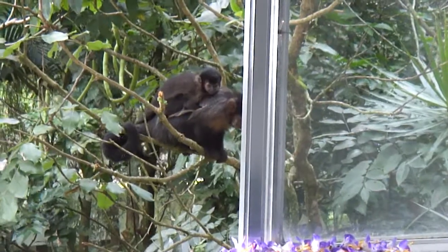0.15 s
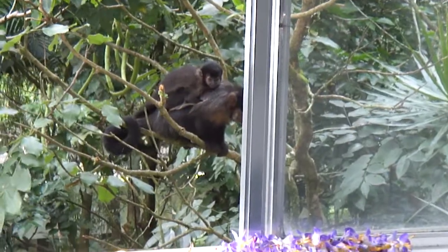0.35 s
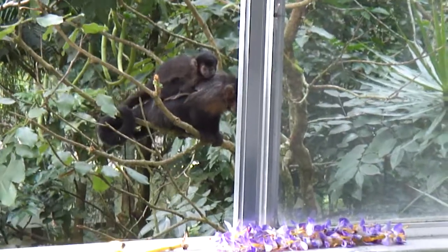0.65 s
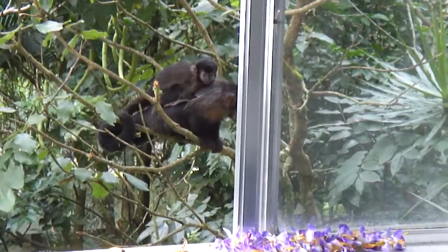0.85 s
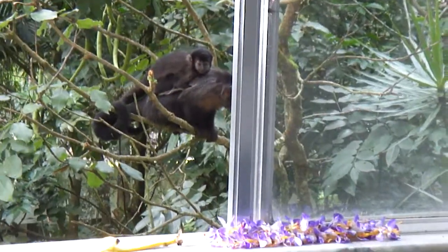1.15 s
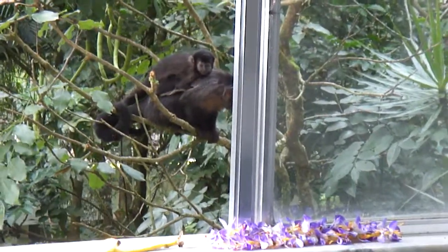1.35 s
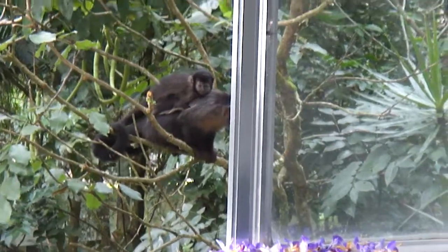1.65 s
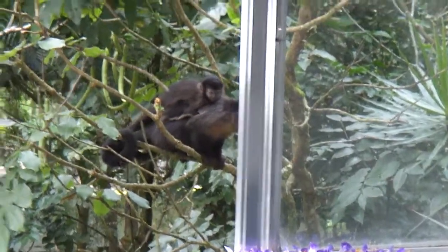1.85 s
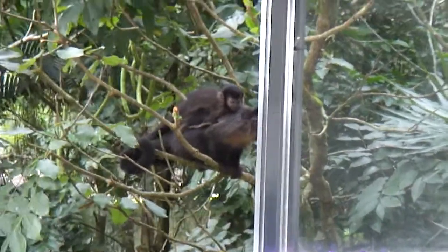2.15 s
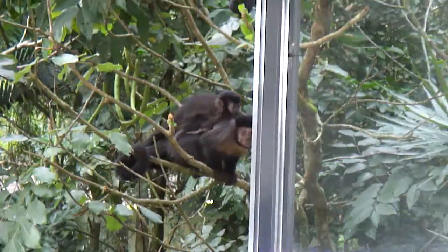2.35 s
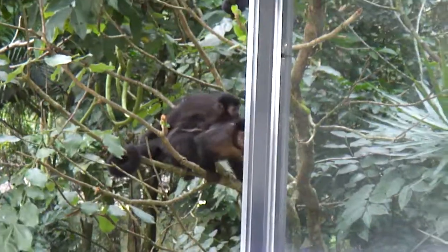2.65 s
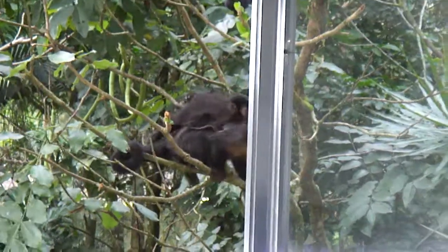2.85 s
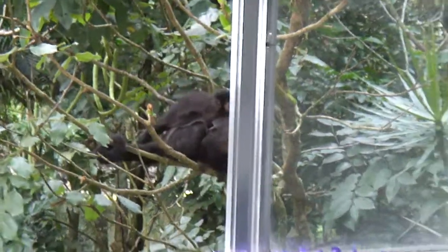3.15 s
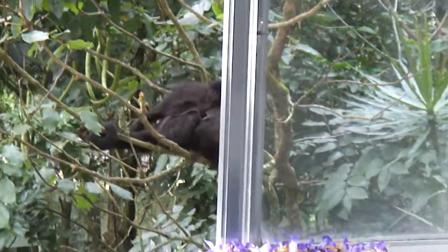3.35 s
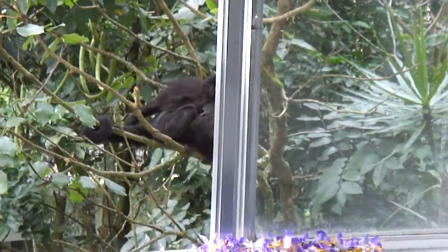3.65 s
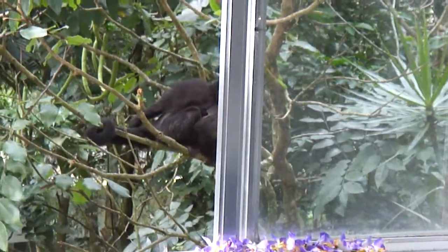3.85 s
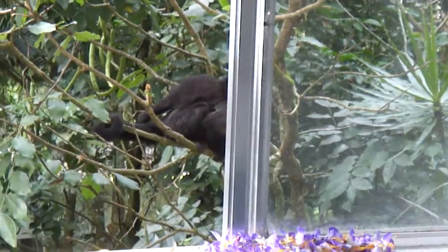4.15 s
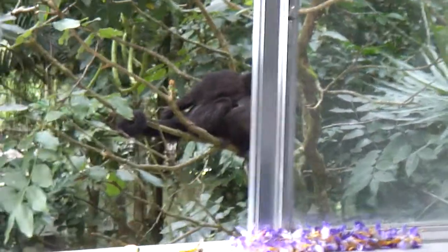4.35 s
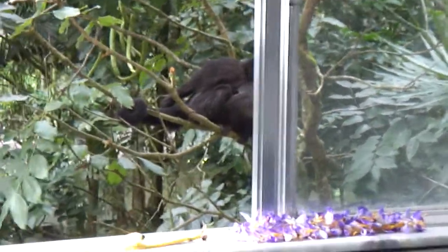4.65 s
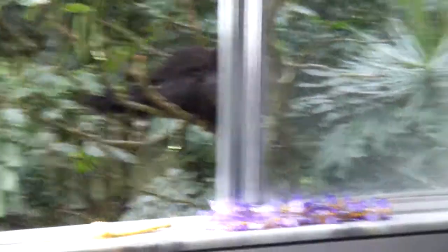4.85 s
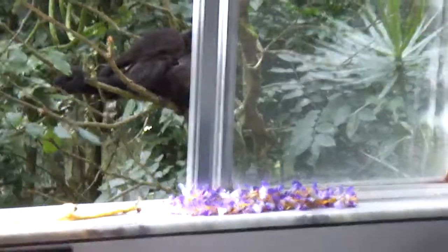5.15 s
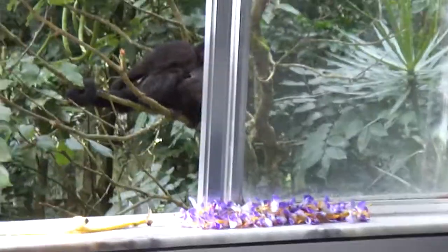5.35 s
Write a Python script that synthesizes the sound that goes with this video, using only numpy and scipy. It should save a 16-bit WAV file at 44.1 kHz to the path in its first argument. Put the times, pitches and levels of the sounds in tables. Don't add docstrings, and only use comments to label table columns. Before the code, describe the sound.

A steady, dull hiss of distant leaves and water runs throughout with a barely audible low hum. After a quiet first second, a monkey a few paces away starts giving tiny whistled chirps, clucks and faint peeps. A bark leads to one loud, piercing, falling shriek near two and a half seconds, then a rapid cluster of chirps and hoots, then sparser calls. One microphone by an open window catches short echoes off wall, glass and trees.

```python
import sys
import numpy as np
from scipy import signal
from scipy.fft import rfft, irfft
from scipy.io import wavfile
from scipy.ndimage import uniform_filter1d

SR = 44100
rng = np.random.default_rng(int(sys.argv[2]) if len(sys.argv) > 2 else 0)


def store_wav(level_fs):
    pcm = np.round(np.clip(np.atleast_2d(level_fs), -1, 1) * 32767)
    wavfile.write(sys.argv[1], SR, pcm.T.astype(np.int16))


def gain_from_db(level_db):
    decades = np.asarray(level_db, float) / 20
    return 10 ** decades


N = 242991

WHISTLES = {"narrow": [(3.748, .023, 1606, -33.5, -5)], "round": [(2.805, 0.0262, 1579, -32.5, -12.5),
            (5.187, .025, 1518, -39, -5.5)], "nasal": [(1.410, .024, 1357, -39, -11)]}


def whistles():
    swell_db, swell_mouth_db = -11.5, -1
    early = 0.4
    break_s, break_share, break_db, break_mouth_db = 0.009, 0.195, -7, 5
    for shape, rows in WHISTLES.items():
        for s, hold, hz, db, mouth_db in rows:
            yield shape, [
                (s, hz, db + swell_db, mouth_db + swell_mouth_db),
                (s + 0.24 * hold, hz, db + early * swell_db, mouth_db + early * swell_mouth_db),
                (s + hold, hz, db, mouth_db),
                (s + hold + break_s, hz * (1 - break_share), db + break_db, mouth_db + break_mouth_db)]


HOOTS = {"nasal": [(1.721, 0.024, 1212, 1263, -44.5), (3.106, 0.03, 938, 909, -42.5)],
         "muffled": [(2.980, 0.03, 1153, 1165, -46)], "wide": [(3.053, 0.017, 1018, 995, -48),
         (3.701, 0.022, 1057, 1050, -53.5)], "gaping": [(4.182, 0.0253, 1014, 1146, -38)]}


def hoots():
    peak_share, sag_share = 0.73, 0.02
    start_db, end_db, close_db = -6, -2.5, -4
    for shape, rows in HOOTS.items():
        for s, length, start_hz, hz, db in rows:
            yield shape, [(s, start_hz, db + start_db, 0),
                          (s + peak_share * length, hz, db, close_db),
                          (s + length, hz * (1 - sag_share), db + end_db, close_db)]


def walk(rate):
    k = int(SR / rate)
    steps = np.repeat(rng.standard_normal(N // k + 1), k)
    return 1.37 * uniform_filter1d(uniform_filter1d(steps, k), k)[:N]


EDGE_S = 0.00208
RELEASE = 1.6


def add_partial(out, start, hz, db):
    t = np.arange(len(hz)) / SR
    ramp = np.clip(np.minimum(t, (t[-1] - t) / RELEASE) / EDGE_S, 0, 1)
    edge = np.sin(ramp * np.pi / 2) ** 2
    tone = np.sin(2 * np.pi * np.cumsum(hz) / SR)
    i = int(start * SR)
    out[i:i + len(t)] += np.sqrt(2) * gain_from_db(db) * edge * tone


CRIES = {"barking": [(2.154, 1128, -38.5, 1), (2.160, 1152, -34, -1), (2.170, 1228, -32.5, -7.5),
         (2.180, 1180, -44, -2)], "shrill": [(2.469, 1790, -48, 5), (2.474, 1750, -37, 0),
         (2.4785, 1670, -25, -2), (2.482, 1530, -36.5, 12), (2.486, 1350, -48, 6)],
         "startled": [(2.904, 1803, -51, 6), (2.908, 1428, -38.5, -1), (2.916, 1240, -46, 7),
         (2.922, 1094, -52, 11.5)], "round": [(3.326, 1530, -47, -1), (3.342, 1430, -46, 0),
         (3.359, 1420, -34, 0), (3.367, 1412, -41, -15), (3.374, 1373, -48.5, 13.5),
         (3.384, 1352, -37.5, 1), (3.390, 1294, -39.5, -15), (3.398, 1220, -43, 9)]}
SHAPES = {"narrow": (-8.5, -13, -37), "round": (-2, -26, -34), "nasal": (-9, -2, -24),
          "wide": (1.4, 0, -21), "gaping": (-4, 1, -2.1), "muffled": (-2, -7.5, -30),
          "barking": (-10.5, 0, -15), "shrill": (-14, -15.5, -37), "startled": (-1.6, -17, -29)}


def voiced_calls():
    out = np.zeros(N)
    tremor = 1 + 0.0022 * walk(150)
    flutter_db = 2.5 * np.array([walk(170) for _ in range(6)])
    glide_rough_s = 0.35
    for shape, corners in [*whistles(), *hoots(), *CRIES.items()]:
        s, *columns = np.transpose(sorted(corners))
        t = np.arange(s[0] - EDGE_S / 2, s[-1] + RELEASE * EDGE_S / 2, 1 / SR)
        hz, db, mouth_db = (np.interp(t, s, column) for column in columns)
        first = int(t[0] * SR)
        shake = 1 + glide_rough_s * np.abs(np.gradient(np.log(hz))) * SR
        hz = hz * tremor[first:][:len(t)] ** shake
        wave_db = flutter_db[:, first:][:, :len(t)]
        add_partial(out, t[0], hz, db + 0.5 * wave_db[0])
        overtones = SHAPES[shape]
        high = [overtones[-1] - 18.0, overtones[-1] - 18.5]
        for k, rel_db in enumerate([*overtones, *high]):
            add_partial(out, t[0], (k + 2) * hz, db + rel_db + mouth_db + wave_db[k + 1])
    return out


# (time
# [s], length [s], start pitch [Hz], end pitch [Hz], level [dB])
LONE_PARTIALS = [(1.434, 0.013, 1310, 1336, -42), (2.468, 0.026, 1920, 1990, -45), (2.499, 0.1, 1750, 1715, -61),
                 (2.839, .014, 1670, 1520, -60), (2.902, .014, 1570, 1540, -60), (2.915, 0.011, 1310, 1380, -36),
                 (2.918, 0.012, 2693, 2610, -43.5), (3.776, 0.019, 3310, 3210, -47.5),
                 (4.191, 0.023, 3137, 3110, -43), (4.927, 0.017, 1590, 1570, -44.5),
                 (4.928, 0.0098, 503, 544, -45), (4.929, 0.013, 3180, 3400, -53), (4.932, 0.018, 2470, 2660, -48),
                 (5.212, 0.025, 1560, 1530, -44.5),
                 (1.217, .026, 3200, 3060, -52), (1.462, .009, 1345, 1340, -48), (1.684, .020, 3400, 3470, -47),
         (1.752, .020, 1220, 1238, -49), (2.178, .040, 3610, 3570, -50), (2.447, .021, 1740, 1780, -42),
         (2.447, .021, 3480, 3560, -50), (2.482, .007, 1710, 1650, -22), (2.482, .030, 3400, 3300, -47),
         (2.490, .017, 1760, 1750, -41), (3.905, .030, 2710, 2670, -53), (3.951, .012, 3220, 3320, -49),
         (5.238, .035, 1525, 1510, -50)]


def clucks_and_peeps():
    out = np.zeros(N)
    for s, length, start_hz, end_hz, db in LONE_PARTIALS:
        add_partial(out, s, np.linspace(start_hz, end_hz, int(length * SR)), db)
    return out


# (time [s], level [dB], lower band edge [Hz])
SNAPS = [
    (2.156, -52, 4000),
    (2.4773, -46, 3000),
    (2.906, -51, 2780),
    (4.1825, -52, 3470),
    (4.930, -45, 2000),
]


def snaps():
    out = np.zeros(N)
    t = np.arange(int(0.012 * SR)) / SR
    peak_s = 0.0027
    for s, db, hz in SNAPS:
        puff = rng.standard_normal(len(t)) * t / peak_s * np.exp(1 - t / peak_s)
        puff = signal.lfilter(*signal.butter(2, [hz, hz * 1.95], "band", fs=SR), puff)
        out[int(s * SR):][:len(t)] += gain_from_db(db) * 2 * puff
    return out


# (delay [s], level [dB])
ECHOES = [(.0075, -11), (.013, -14), (.024, -18), (.033, -15), (.052, -20), (.068, -19), (.105, -20)]
# (pitch [Hz], 60 dB decay [s], level [dB])
RECESS = [(1140, .4, -48), (1280, 0.37, -37), (1530, 0.45, -66), (1750, .7, -50), (3310, .35, -44)]


def yard(x):
    t = np.arange(SR // 2) / SR
    tail_db, tail_t60_s, tail_top_hz = -8.5, 0.6, 5000
    build_up = np.clip(t / 0.012, 0, 1)
    tail = rng.standard_normal(len(t)) * gain_from_db(-60 * t / tail_t60_s) * build_up ** 2
    tail = signal.lfilter(*signal.butter(1, tail_top_hz, fs=SR), tail)
    response = tail * gain_from_db(tail_db) / np.sqrt(np.sum(tail ** 2) / tail_top_hz * SR / np.pi)
    response[0] = 1
    scatter_s = 0.003
    for k, (delay, db) in enumerate(ECHOES):
        if k == 0:
            facets = 1.0 * (np.arange(len(t)) == int(delay * SR))
        else:
            facets = rng.standard_normal(len(t)) * np.exp(-((t - delay) / scatter_s) ** 2)
        response += gain_from_db(db) * facets / np.sqrt(np.sum(facets ** 2))
    response[1:] = signal.lfilter(*signal.butter(2, 5200, fs=SR), response[1:])
    for hz, t60, db in RECESS:
        response += gain_from_db(db - 60 * t / t60) * np.sin(2 * np.pi * hz * t) * build_up / 10
    return signal.fftconvolve(x, response)[:N]


# (frequency [Hz], density per Hz [dB])
HISS = [(15, -64), (25, -31.5), (69, -16.5), (109, -11.5), (159, -6.5), (195, -7), (239, -3.5), (429, -2),
        (475, -2.5), (873, -2.5), (966, -2.5), (2180, -7.5), (5560, -16.5), (10800, -31.5), (14000, -51),
        (22000, -120)]


def hiss():
    hz = np.maximum(np.fft.rfftfreq(N, 1 / SR), 1)
    shape = np.array(HISS)
    gain = gain_from_db(np.interp(np.log(hz), np.log(shape[:, 0]), shape[:, 1]))
    out, edges_hz = 0, [0, 300, 1500, SR]
    for lo, hi in zip(edges_hz, edges_hz[1:]):
        band = irfft(rfft(rng.standard_normal(N)) * gain * (hz > lo) * (hz <= hi), N)
        out = out + band * gain_from_db(0.3 * walk(3.08))
    return out * gain_from_db(-47) / np.sqrt(np.mean(out ** 2))


def hum():
    hum_hz, hum_db, octave_db = 97, -77, -72
    surge_db, surge_s, surge_width_s = 6, 2.4, 0.37
    surge = np.exp(-((np.arange(N) / SR - surge_s) / surge_width_s) ** 2)
    level_db = hum_db + surge_db * surge + 3 * walk(11)
    turn = 2 * np.pi * hum_hz * np.cumsum(1 + 0.0144 * walk(5.9)) / SR
    return np.sqrt(2) * (gain_from_db(level_db) * np.sin(turn) + gain_from_db(octave_db) * np.sin(2 * turn))


def scene():
    monkey = voiced_calls() + clucks_and_peeps() + snaps()
    return (yard(monkey) + hiss() + hum())[None]


def low_pass(x):
    return signal.sosfilt(signal.butter(12, 10910, fs=SR, output="sos"), x)


def record(dry):
    top_cut = signal.ellip(10, 0.2, 60, 10930, fs=SR, output="sos")
    mix = signal.sosfilt(top_cut, dry)
    return low_pass(mix)


dry = scene()
out = record(dry)
store_wav(out)
```